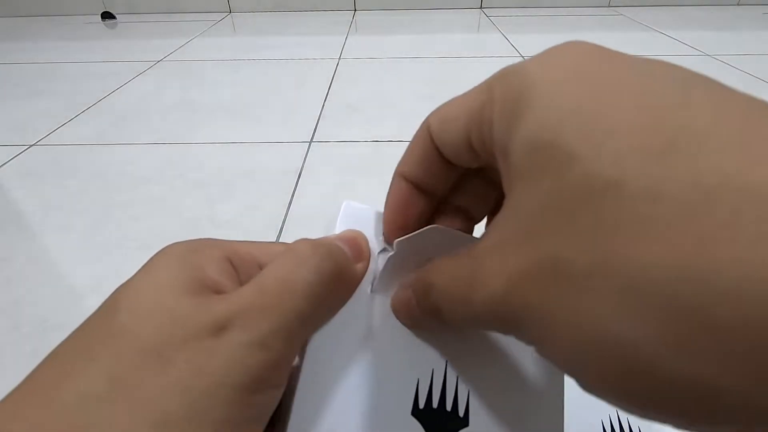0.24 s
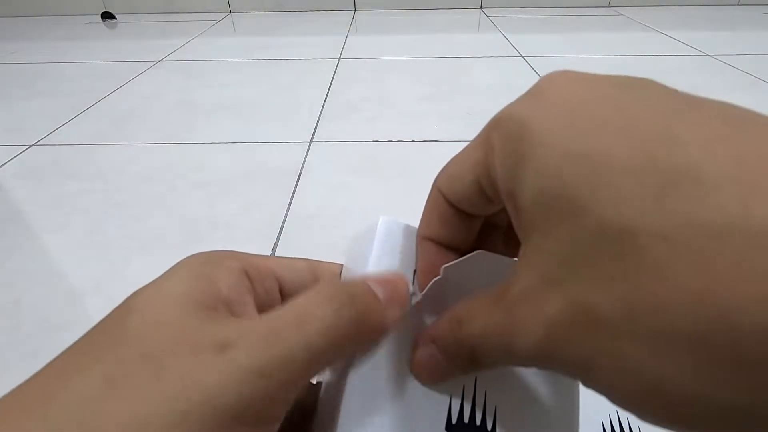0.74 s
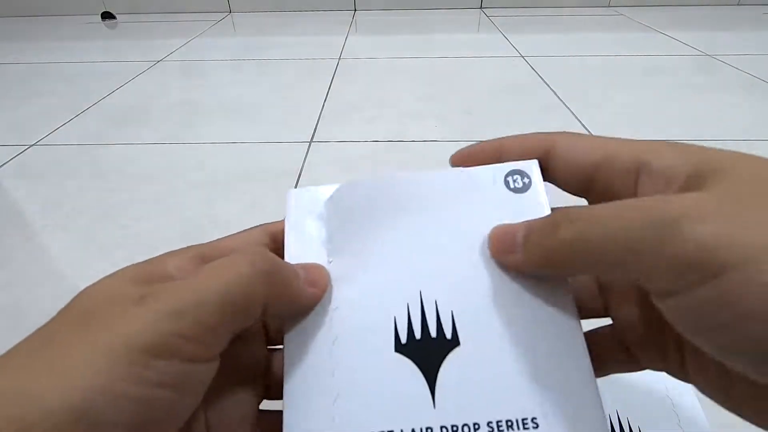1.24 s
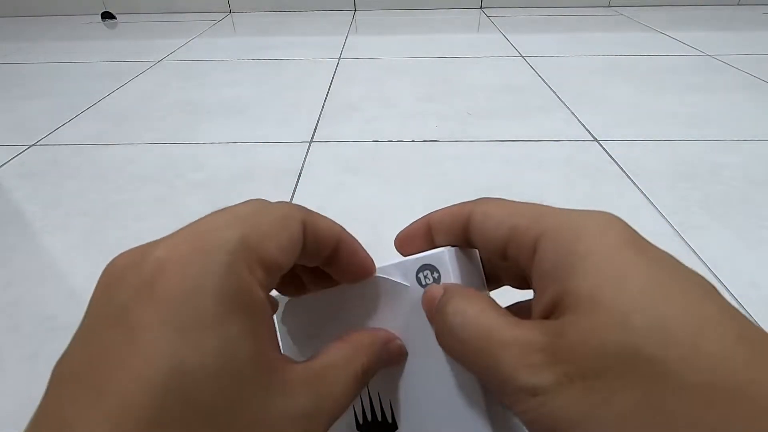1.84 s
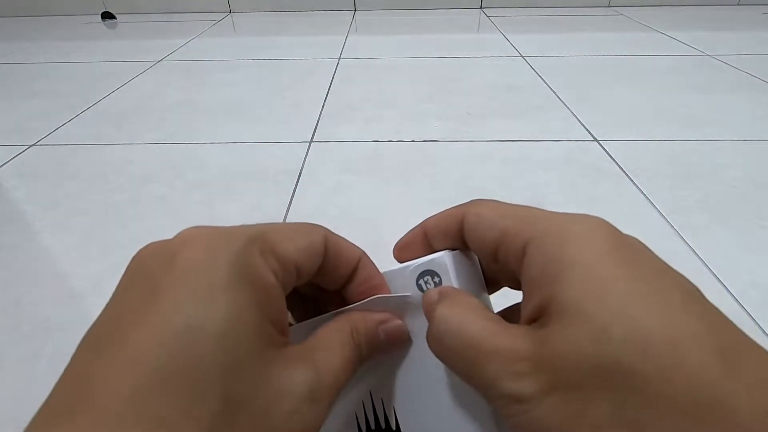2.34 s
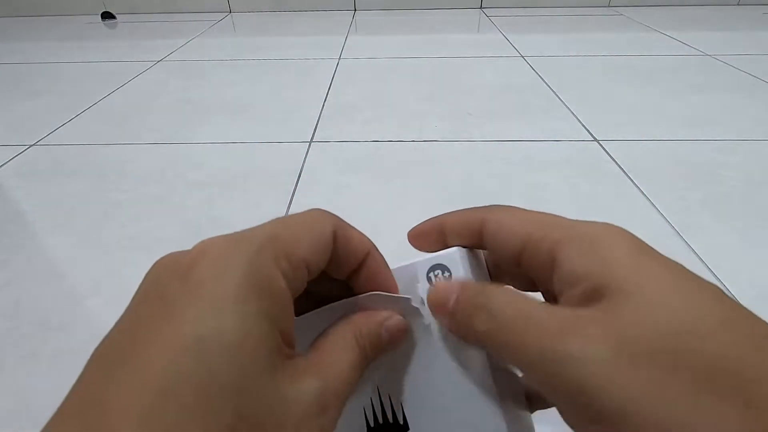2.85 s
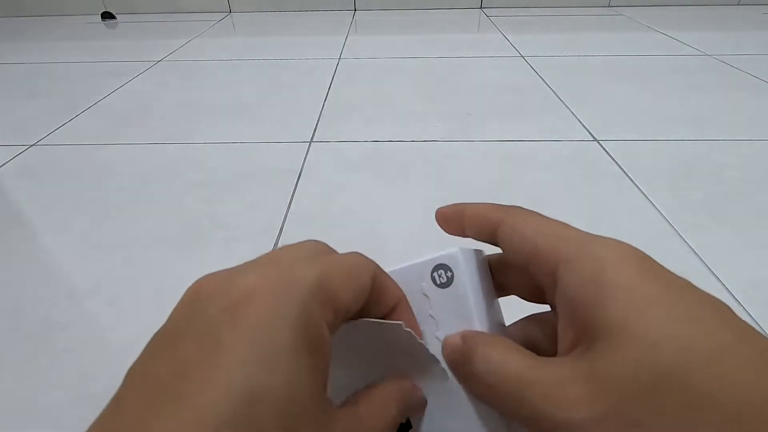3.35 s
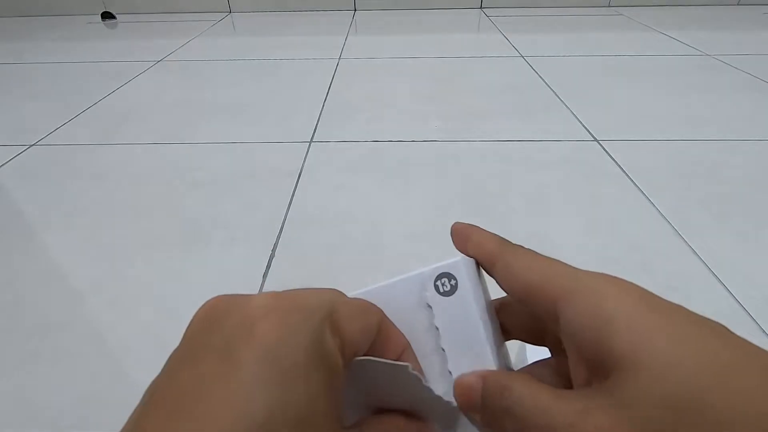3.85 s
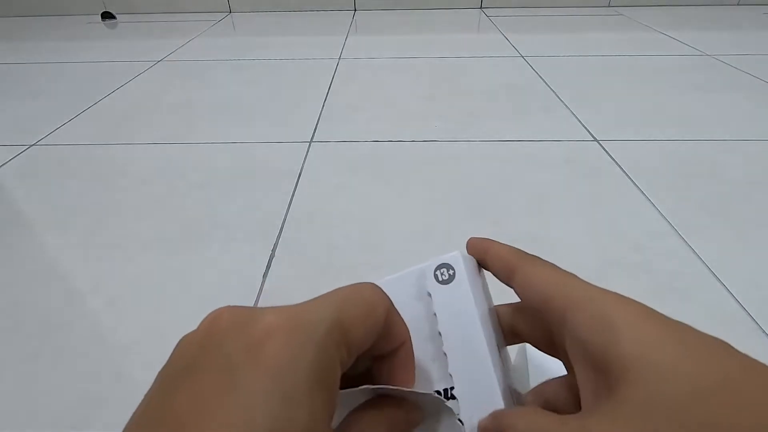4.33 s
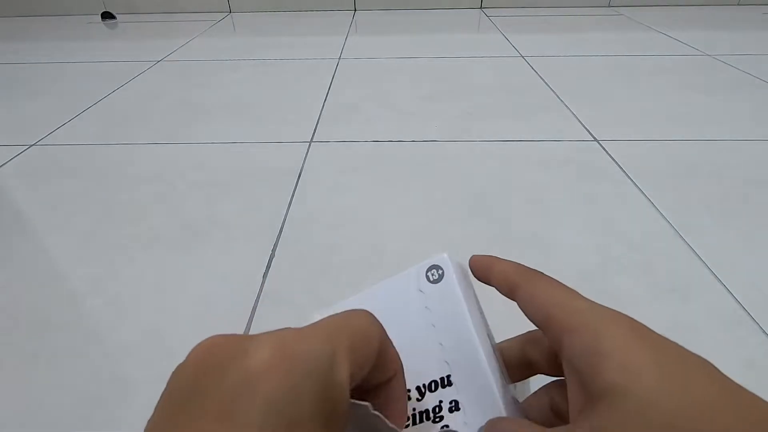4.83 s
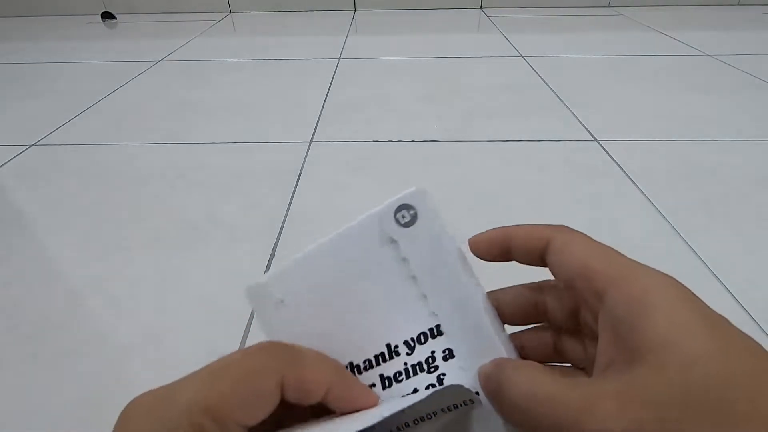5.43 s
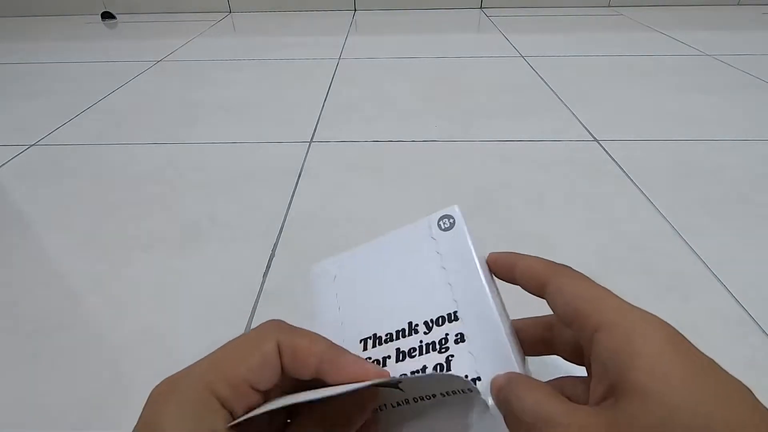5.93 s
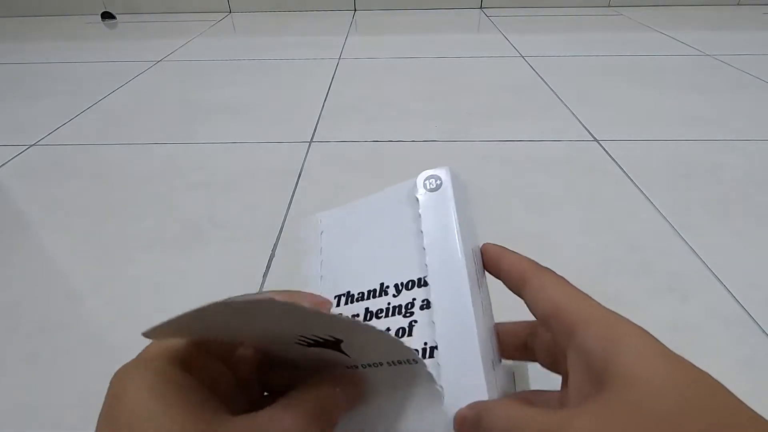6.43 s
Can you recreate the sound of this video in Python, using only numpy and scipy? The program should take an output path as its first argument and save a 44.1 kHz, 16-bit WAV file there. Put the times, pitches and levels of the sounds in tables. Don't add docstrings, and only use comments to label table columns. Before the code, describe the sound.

Close, dry card snaps come singly and in clusters, with faint finger rubbing, small creases, hollow box knocks and bright short room echo.

```python
import sys
import numpy as np
from scipy import signal
from scipy.fft import rfft, irfft
from scipy.io import wavfile
from scipy.ndimage import uniform_filter1d

SR = 44100
rng = np.random.default_rng(int(sys.argv[2]) if len(sys.argv) > 2 else 0)


def field_ratio(decibels):
    return 10 ** (np.asarray(decibels, dtype=float) / 20)


def dump(signal):
    limited = np.clip(np.atleast_2d(signal).T, -1, 1)
    pcm = np.round(limited * 32767).astype(np.int16)
    wavfile.write(sys.argv[1], SR, pcm)


N = 294588
LEAD_S = 0.013


def evened(x):
    return x / np.sqrt(np.mean(x ** 2) + 1e-20)


def peaked(pair):
    energy = np.linalg.norm(pair, axis=1, keepdims=True)
    return pair / energy * np.linalg.norm(pair[0]) / abs(pair[0]).max()


def read(points, hz):
    f, value = np.transpose(points)
    return np.interp(np.log(hz + 1), np.log(f + 1), value)


def level_curve(rows):
    s, db = np.transpose(rows)
    return np.interp(np.arange(N) / SR, s, db)


def add(mix, s, sound):
    start = round(s * SR)
    part = mix[:, start:start + sound.shape[1]]
    part += sound[:, :part.shape[1]]


def ring(x, hz, width):
    r = np.exp(-np.pi * width / SR)
    pole = r * np.exp(2j * np.pi * hz / SR)
    return 2 * (1 - r) * signal.lfilter([1], [1, -pole], x).real


def causal(points):
    hz = abs(np.fft.fftfreq(2048, 1 / SR))
    log_gain = np.log(field_ratio(read(points, hz)))
    phase = -signal.hilbert(log_gain).imag
    return np.fft.ifft(np.exp(log_gain + 1j * phase)).real[:1024]


def noise(points, patchy_db, size):
    frames = 4 * N // size + 5
    hz = np.fft.rfftfreq(size, 1 / SR)
    a, b, patches = rng.standard_normal((frames, len(hz), 3)).T
    patches = uniform_filter1d(patches, size=5, axis=0)
    patches = evened(uniform_filter1d(patches, size=8, axis=1))
    spectra = (a + 1j * b) * field_ratio(read(points, hz)[:, None] + patchy_db * patches)
    return evened(signal.istft(spectra, nperseg=size, noverlap=size * 3 // 4)[1][:N])


def hiss():
    return field_ratio(-56) * rng.standard_normal(N)


# time in seconds, level in dB.
HUM_LEVEL = [(0.0, -41), (0.05, -37), (0.17, -39.5), (0.26, -38), (0.46, -45.5), (0.57, -42), (1.15, -38.5),
             (1.34, -42.5), (1.62, -41), (1.97, -40.5), (2.57, -41), (2.94, -42), (3.22, -42),
             (3.37, -38.5), (3.87, -44.5), (4.15, -43), (4.48, -42), (4.74, -42), (4.95, -38.5),
             (5.1, -40.5), (5.54, -44), (5.84, -41.5), (5.95, -43), (6.29, -45.5), (6.68, -41.5)]
# frequency in Hz, level in dB per Hz.
HUM_TONE = [(41, -25), (70, -13.5), (118, 0), (190, -5.5), (233, -4.5), (276, -10), (387, -21),
            (428, -13.5), (458, -14.5), (1630, -31), (2070, -36.5), (4000, -48), (5200, -80), (8800, -120)]


def hum():
    return field_ratio(level_curve(HUM_LEVEL) + 4.0) * noise(HUM_TONE, patchy_db=2.5, size=2048)


# time in seconds, level in dB.
SHAKE_LEVEL = [(0.0, -39), (0.09, -32.5), (0.18, -50), (0.24, -29), (0.43, -40.5), (0.48, -30.5),
               (0.74, -38), (0.82, -28.5), (1.08, -46), (1.11, -33), (1.19, -47), (1.34, -32.5),
               (1.49, -40), (1.54, -33), (1.78, -40), (1.86, -35.5), (1.99, -47), (2.16, -30.5),
               (2.23, -40), (2.31, -33.5), (2.62, -38.5), (2.68, -27), (2.98, -29.5), (3.07, -42),
               (3.12, -43), (3.2, -33), (3.29, -49), (3.37, -32.5), (3.7, -44.5), (4.0, -28.5), (4.11, -48),
               (4.2, -34), (4.54, -34.5), (4.6, -32), (4.65, -36), (4.97, -39), (5.04, -26), (5.1, -30),
               (5.15, -22), (5.23, -35.5), (5.3, -24.5), (5.36, -44), (5.49, -42), (5.58, -47),
               (5.75, -37.5), (5.8, -42), (5.86, -33.5), (6.4, -34.5), (6.59, -39), (6.68, -44)]
# frequency in Hz, level in dB per Hz.
SHAKE_TONE = [(8.8, -38), (15, 14.5), (27, -4.5), (55, 1.5), (68, -1.5), (90, -26.5), (120, -32),
              (200, -120)]


def rumble():
    return field_ratio(level_curve(SHAKE_LEVEL) - 0.7) * noise(SHAKE_TONE, patchy_db=0.7, size=4096)


# frequency in Hz, time to die by 60 dB in seconds.
ROOM_DECAY = [(200, 1), (530, 0.47), (1400, 0.54), (3700, 0.58), (9700, 0.41), (15000, 0.33)]
# frequency in Hz, level in dB.
ROOM_TONE = [(200, 5), (700, 4.5), (1700, 1.5), (3000, 0), (7000, 2), (10000, 2), (15000, 3.5)]


def room(x):
    out = np.zeros(N)
    turn = np.arange(N) / SR * 7.3
    for k, taps in enumerate(rng.standard_normal((3, SR * 3 // 4))):
        hz, t, spectra = signal.stft(taps, SR, nperseg=256)
        decay_db = 60 * t / read(ROOM_DECAY, hz)[:, None]
        spectra = spectra * field_ratio(read(ROOM_TONE, hz)[:, None] - decay_db)
        tail = signal.istft(spectra, SR, nperseg=256)[1]
        tail = tail * (1 - np.exp(-(np.arange(len(tail)) / SR / 0.0028) ** 2))
        share = np.sqrt(2 / 3) * np.cos(turn + k * np.pi / 3)
        out += signal.fftconvolve(x * share, tail / np.linalg.norm(tail))[:N]
    return out


# start in seconds, level in dB, pitch in Hz.
KNOCKS = [(0.054, -10, 326), (0.079, -11, 350), (0.952, -21, 266), (1.113, -20.5, 283), (1.714, -19.5, 249),
          (2.033, -21, 360), (2.66, -18.5, 373), (2.7, -14, 246), (3.193, -7, 366), (3.207, -6.5, 348),
          (3.415, -19, 350), (3.578, -27, 273), (3.805, -10.5, 266), (3.841, -14.5, 347),
          (4.001, -16.5, 356), (4.124, -17, 356), (4.169, -20, 266), (4.298, -24, 255), (4.472, -24, 237),
          (4.792, -2.5, 356), (4.83, -14, 367), (4.887, -17.5, 248), (5.599, -23.5, 337), (5.85, -16, 301),
          (5.878, -13.5, 370), (6.006, -7.5, 338), (6.049, -15, 339), (6.108, -8, 269), (6.166, -15, 266),
          (6.212, -17.5, 270)]


def knocks():
    out = np.zeros((2, N))
    t = np.arange(3000) / SR
    to_mic_and_walls = field_ratio([[0], [-2.5]])
    for s, db, hz in KNOCKS:
        push = 1 - np.exp(-t / 0.0015)
        swing = push * np.exp(-np.pi * 75 * t) * np.sin(2 * np.pi * hz * t)
        add(out, s + 0.00077, field_ratio(db - 0.5) * swing / abs(swing).max() * to_mic_and_walls)
    return out


# time in seconds, level in dB.
RUB_STROKES = [
    [(0.0, -44), (0.012, -47), (0.016, -38), (0.045, -28.5)],
    [(0.22, -40.5), (0.344, -48), (0.42, -62), (0.63, -78.5), (0.644, -45.5), (0.68, -67), (0.768, -72),
     (0.796, -43), (0.888, -71.5), (0.94, -38)],
    [(1.0, -44), (1.076, -27.5), (1.254, -75), (1.342, -36), (1.524, -71.5), (1.576, -64), (1.644, -69),
     (1.662, -48), (1.704, -61), (1.718, -36.5), (1.724, -51.5), (1.954, -74), (2.02, -39)],
    [(2.14, -57), (2.23, -61), (2.336, -38.5), (2.346, -33.5), (2.352, -36), (2.44, -44.5)],
    [(2.55, -46), (2.624, -52.5), (2.65, -37)],
    [(2.9, -47.5), (3.022, -49.5), (3.06, -76), (3.066, -46.5), (3.152, -63), (3.18, -38)],
    [(3.45, -35.5), (3.49, -41), (3.568, -61), (3.578, -34), (3.598, -52), (3.74, -55), (3.79, -47.5)],
    [(4.03, -38.5), (4.058, -34), (4.078, -44), (4.11, -39.5)],
    [(4.35, -45.5), (4.584, -61), (4.616, -39.5), (4.626, -50), (4.76, -55.5), (4.774, -35.5),
     (4.78, -32.5)],
    [(4.95, -31), (5.026, -40.5), (5.066, -26.5), (5.184, -48.5), (5.292, -50), (5.346, -70),
     (5.358, -45.5), (5.396, -56), (5.44, -42), (5.5, -57.5), (5.748, -37), (5.84, -47)],
    [(6.25, -41), (6.408, -65.5), (6.426, -41.5), (6.516, -64.5), (6.608, -33), (6.614, -50.5),
     (6.68, -38.5)],
]
# frequency in Hz, level in dB per Hz.
RUB_TONE = [(470, -53), (800, -6), (1440, -12), (1950, 7), (2260, -49), (2560, 6), (3060, -2), (6160, 7),
            (13400, 1), (16000, -1)]


def rub():
    sizes = field_ratio(2.5 * np.minimum(rng.exponential(1, N), 4))
    slips = sizes * (rng.random(N) < 500 / SR)
    grip = 1 + .25 * signal.lfilter([1], [1, -np.exp(-1 / (.002 * SR))], slips)
    hissing = evened(noise(RUB_TONE, patchy_db=7.5, size=256) * grip)
    return field_ratio(level_curve(np.vstack(RUB_STROKES)) - 0.5) * hissing


def burst(ms, grains, lead_db):
    t = np.arange(len(grains)) / SR - LEAD_S
    u = np.maximum(t, 0) / (ms / 1000)
    stretch = field_ratio(lead_db) * np.exp(np.minimum(t, 0) / 0.0051) * (t < .001)
    rush = (1 - np.exp(-u / 0.16)) * np.exp(-u ** 2.0)
    uneven = grains * abs(grains) ** 0.28
    return uneven * (rush + stretch)


def drives(rush):
    z = rfft(rush)
    smooth_power = uniform_filter1d(abs(z) ** 2, size=90)
    rush = irfft(z / np.sqrt(smooth_power + 1e-20), len(rush))
    clean = np.zeros(len(rush))
    clean[round(LEAD_S * SR) + 40] = np.linalg.norm(rush)
    return np.array([rush, clean])


# frequency in Hz, level in dB.
CRACK_TONE = [(300, -21), (800, -5.5), (1500, -7), (4000, -1), (8000, 2), (9500, 0.5), (12000, -10),
              (16000, -36)]


def bare_crack(drive):
    return peaked(signal.lfilter(causal(CRACK_TONE), 1, drive))


# start in seconds, level in dB, centre in Hz, length in milliseconds.
TICKS = [(0.018, -19, 7240, 3.8), (0.0328, -26, 1880, 2.9), (0.1901, -8, 6750, 3.8),
         (0.2961, -18, 1850, 3.8), (0.333, -21.5, 7120, 4.3), (0.403, -29, 1830, 3.2),
         (0.645, -19.5, 4370, 3.8), (0.7965, -26, 1780, 4.6), (1.041, -9.5, 6890, 4.5),
         (1.1134, -15, 1830, 3.8), (1.2712, -33, 1800, 3.8), (1.3124, -26.5, 1730, 3.8),
         (1.3257, -30, 3070, 3.5), (1.337, -26, 5900, 2.4), (1.5773, -41, 1690, 3.8),
         (1.6594, -26, 2450, 3.2), (1.715, -17, 1940, 3.5), (1.7564, -22.5, 2570, 4.4),
         (2.1144, -16, 6900, 6.1), (2.3175, -30, 1740, 2.7), (2.3443, -17.5, 1970, 2.5),
         (2.4094, -25, 2500, 3.8), (2.5318, -15, 1700, 4.1), (3.0702, -21.5, 2430, 3.4),
         (3.4937, -18, 5940, 3.8), (3.5784, -20, 2470, 2.9), (3.684, -24, 6100, 3.8),
         (3.7432, -22, 1780, 4.4), (4.0502, -19.5, 2740, 3.8), (4.2975, -13.5, 1820, 3.7),
         (4.3339, -13, 1740, 3.8), (4.416, -21.5, 1780, 2.5), (4.4747, -25.5, 2600, 4.4),
         (4.6126, -22, 7450, 3.4), (4.699, -28, 1740, 3.8), (4.7533, -31, 1760, 3.8),
         (4.772, -10.5, 1750, 3.8), (4.9732, -10.5, 2730, 3.8), (5.1976, -31, 2790, 3.8),
         (5.2247, -27, 7230, 4.5), (5.2785, -25, 1970, 3.2), (5.294, -29, 6080, 3.8),
         (5.3573, -30, 11100, 3.8), (5.3822, -34, 1870, 3.8), (5.436, -31.5, 1860, 4.4),
         (5.5656, -30, 6260, 4.1), (5.601, -24, 2010, 3.5), (5.69, -27.5, 6360, 3.2),
         (5.7116, -27, 6290, 3.8), (6.2126, -13.5, 3700, 3.2), (6.4257, -23.5, 2560, 3.8),
         (6.5991, -22.5, 7600, 4.1)]


def ticks():
    out = np.zeros((2, N))
    for s, db, hz, ms in TICKS:
        drive = drives(burst(ms, rng.standard_normal(2000), lead_db=-21))
        second_hz = 1800 * rng.uniform(.7, 1.4)
        spot = peaked(ring(drive, hz, 0.1 * hz) + field_ratio(-11) * ring(drive, second_hz, 490))
        tick = peaked(spot + field_ratio(-1.5) * bare_crack(drive))
        add(out, s - LEAD_S - .0006, field_ratio(db - 3.0) * tick)
    return out


# frequency in Hz, width in Hz, level in dB.
CARD_MODES = [(4370, 670, 7), (6610, 490, 7.5), (11430, 410, 7)]


def card_ring(drive):
    total = 0
    for hz, width, db in CARD_MODES:
        total = total + field_ratio(db) * ring(drive, hz * rng.uniform(.93, 1.07), width)
    return peaked(total)


# start in seconds, crack level in dB, level of the finest fibres in dB
# against the crack, flap level in dB against the crack, flap pitch in Hz, burst length in milliseconds.
SNAPS = [(0.0531, -4.5, -23, -10, 1840, 4.1), (0.077, 3.5, -12.5, -18, 1850, 6.2),
         (0.9538, 1.5, -7, -15, 1610, 2.4), (2.0311, -9.5, -30, -15.5, 1800, 4.5),
         (2.4542, -14.5, -20, -20, 2550, 4), (2.4864, -17, -31, -18, 1910, 3.5),
         (2.5007, -15, -24, -8, 1900, 5.5), (2.6613, -1, -3.5, -7, 1670, 2.9), (2.7, -8, -17, -1, 2380, 4),
         (2.8699, -21, -32, -4, 2510, 2.9), (3.1918, -5, -6, -4.5, 1830, 4.2),
         (3.2083, 8.5, -14, -12.5, 2580, 2.8), (3.2359, -5.5, -12, -8, 1556, 4.5),
         (3.4143, -12.5, -17, -19, 1950, 3.5), (3.8063, 1, -16, -14, 1830, 3.5),
         (3.8409, -15.5, -24, 12.5, 1775, 3.14), (4.0007, -14.5, -26, -11.5, 2050, 3.5),
         (4.1231, 11.5, -18.5, -11.5, 1890, 2.96), (4.795, 7, -17, -11, 1820, 4.8),
         (4.8327, -0.5, -25, -14, 1790, 3.5), (4.8887, -4.5, -22, -5.5, 1890, 4.5),
         (5.0682, -17.5, -27, -13, 2640, 5.4), (5.852, 7, -11.5, -15, 1780, 4.24),
         (5.8775, -2.5, -21, -15, 1900, 2), (6.0059, 8, -19, -46, 2740, 2.1),
         (6.0503, -2, -22, -13, 2650, 6.2), (6.1072, -0.5, -12, -27.5, 1930, 2.1)]


def snaps():
    out = np.zeros((2, N))
    for s, db, top_db, flap_db, flap_hz, ms in SNAPS:
        drive = drives(burst(ms, rng.standard_normal(3000), lead_db=-28.5))
        crack = peaked(bare_crack(drive) + field_ratio(-6) * card_ring(drive))
        finest = peaked(ring(ring(drive, 10500, 4500), 10500, 4500))
        flap = peaked(ring(drive, flap_hz, 380) + field_ratio(-13.5) * ring(drive, 1.39 * flap_hz, 280))
        snap = crack + field_ratio(top_db + 6) * finest + field_ratio(flap_db + 9) * flap
        add(out, s - LEAD_S - .0006, field_ratio(db + 2.5) * snap)
    return out


# frequency in Hz, level in dB against their sum.
PORTS = [(60, -44), (110, -42), (200, -50), (380, -39.5), (700, -29), (1290, -30.5), (2380, -31.5),
         (4400, -24), (8120, -24.5), (15000, -24)]


def port_difference(mid):
    late = np.pad(causal(PORTS), (300, 0))
    return signal.oaconvolve(mid, late)[:N]


def scene():
    direct, radiated = snaps() + ticks() + knocks()
    fingers = rub()
    echo = field_ratio(-7) * room(radiated + 0.54 * fingers)
    mid = direct + fingers + echo + hum() + rumble() + hiss()
    side = port_difference(mid)
    return np.array([mid + side, mid - side])


# frequency in Hz, level in dB.
MIC_TONE = [(3000, -0.5), (8000, -1), (9000, -6), (11800, 0), (12300, 2), (15800, -2)]


def microphone(dry):
    return signal.oaconvolve(dry, causal(MIC_TONE)[None])[:, :N]


def limiter(x):
    power = uniform_filter1d((x ** 2).mean(0), size=90, origin=44)
    power_db = 10 * np.log10(abs(power) + 1e-12)
    fall = np.arange(N) * 110.0 / SR
    held_db = np.maximum.accumulate(power_db + fall) - fall
    over_db = np.maximum(held_db - 0.5, 0)
    return x / field_ratio(.5 * uniform_filter1d(over_db, size=130, origin=64))


def low_pass(x):
    return signal.sosfilt(signal.butter(12, 16120, fs=SR, output="sos"), x)


def record(dry):
    ducked = limiter(microphone(dry))
    return low_pass(np.clip(ducked, -1, 1))


dry = scene()
out = record(dry)
dump(out)
```